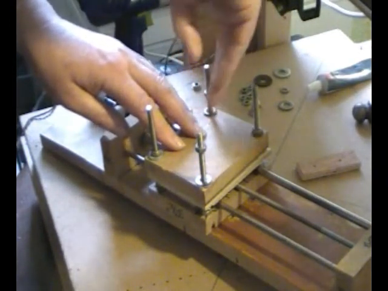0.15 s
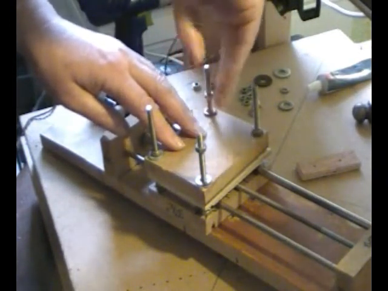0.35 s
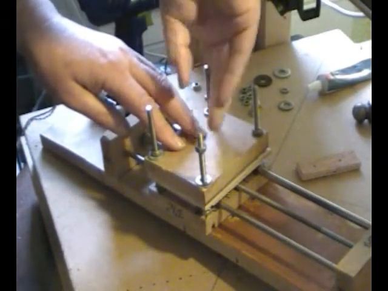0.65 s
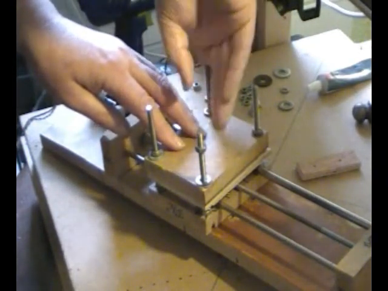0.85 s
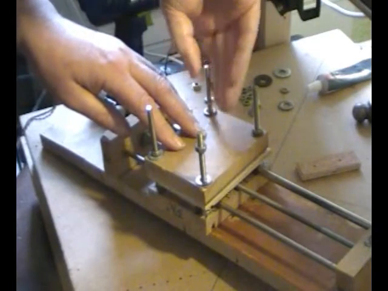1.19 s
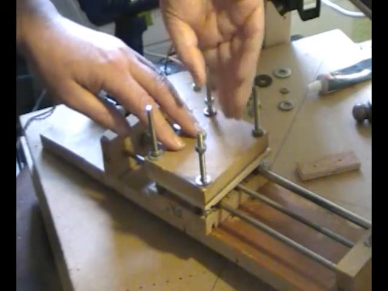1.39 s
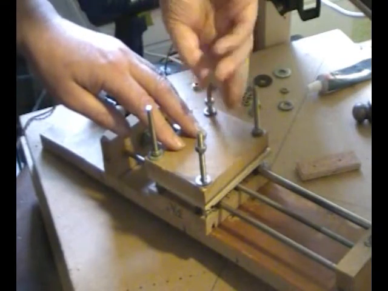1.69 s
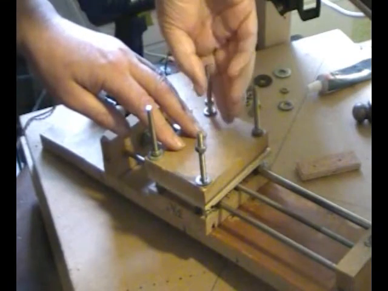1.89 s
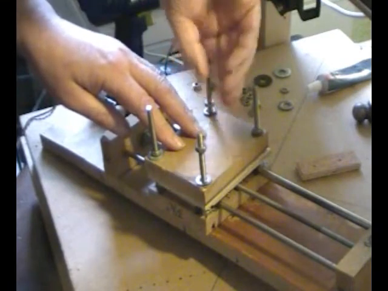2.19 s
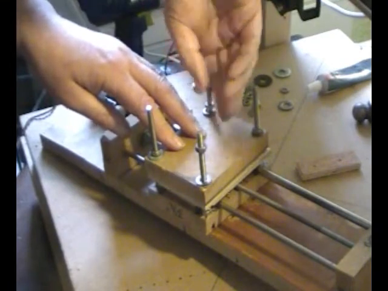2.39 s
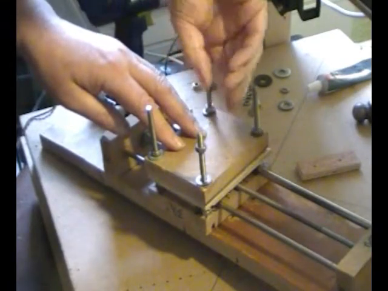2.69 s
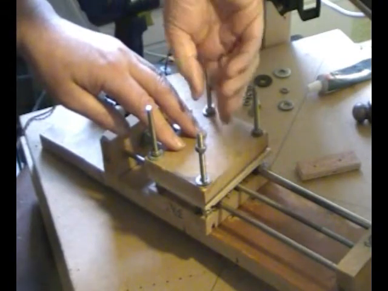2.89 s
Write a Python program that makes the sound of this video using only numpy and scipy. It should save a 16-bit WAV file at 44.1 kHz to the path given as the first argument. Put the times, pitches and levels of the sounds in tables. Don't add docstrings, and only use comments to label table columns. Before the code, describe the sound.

A steel nut is flicked down a threaded bolt on a wooden jig: five quick clacks with brief rattles, a short pause, then steady flicks again, close up in a small workshop with quiet hiss.

```python
import sys
import numpy as np
from scipy import signal
from scipy.io import wavfile
from scipy.ndimage import uniform_filter1d

SR = 44100
rng = np.random.default_rng(int(sys.argv[2]) if len(sys.argv) > 2 else 0)


def transcribe(signal):
    frames = np.atleast_2d(signal).T
    limited = np.clip(frames, -1, 1)
    pcm = np.round(limited * 32767).astype(np.int16)
    wavfile.write(sys.argv[1], SR, pcm)


def decibels_to_gain(level_db):
    exponent = np.asarray(level_db, float) / 20
    return 10 ** exponent


N = 134505
TIME_S = np.arange(N) / SR


def evened(x):
    return x / np.sqrt(np.mean(x ** 2) + 1e-20)


def read(points, hz):
    f, value = np.transpose(points)
    return np.interp(np.log(hz + 1), np.log(f + 1), value)


def add(mix, s, sound):
    part = mix[..., max(round(s * SR), 0):][..., :sound.shape[-1]]
    part += sound[..., :part.shape[-1]]


def through(force, response):
    return signal.oaconvolve(force, response)[:N]


def highpass(x, order, hz):
    return signal.sosfilt(signal.butter(order, hz, "high", fs=SR, output="sos"), x)


def ringing(hz, width_hz):
    t = np.arange(4096) / SR
    ring = np.exp(-np.pi * width_hz * t) * np.sin(2 * np.pi * hz * t)
    return ring / np.linalg.norm(ring)


def causal(points):
    half = np.log(decibels_to_gain(read(points, np.fft.rfftfreq(4096, 1 / SR))))
    full = np.r_[half, half[-2:0:-1]]
    taps = np.fft.ifft(np.exp(np.conj(signal.hilbert(full)))).real[:2048]
    return taps / np.linalg.norm(taps)


def share(force, nut_db, bolt_db):
    return force * decibels_to_gain([[-nut_db / 2], [nut_db / 2], [bolt_db]])


# (time [s], peak [dB], nut against board [dB], contact [s], bolt [dB])
FLICKS = [(0.186, -9, 12.5, 0.0016, 0), (0.3975, -7, 2.5, 0.0018, -8.5), (0.6, -11, 18, 0.002, -3.5),
          (0.818, -9, 6.5, 0.0026, -2), (1.0165, -15, 4.5, 0.003, 0.5), (1.5313, -29, -21, 0.0059, 11.5),
          (1.7698, -13.5, -4, 0.0025, -1), (2.022, -11.5, -2, 0.0025, 0.5),
          (2.2752, -15, -3.5, 0.0045, -1.5), (2.3056, 0.5, 4.5, 0.003, -18), (2.5363, -10.5, 2, 0.0023, -6),
          (2.767, -16, 1.5, 0.0032, 3), (3.0025, -4.5, 11, 0.0028, 3)]
# (time [s], peak [dB], nut against board [dB], contact [s], bolt [dB])
KNOCKS = [(0.0663, -26, 11, 0.0054, -8), (0.085, -25, 15, 0.0037, 3), (0.212, -21.5, -4, 0.00066, 14),
          (0.2286, -12.5, 4, 0.00079, 3.5), (0.2735, -26.5, 9, 0.0042, -2), (0.4269, -23.5, 14, 0.0077, 7),
          (0.46, -15, 8, 0.0019, -17), (0.6019, -5, 10, 0.0016, -1), (0.6312, -13.5, 12, 0.0039, -2.5),
          (0.8534, -28, -7, 0.00064, 18), (1.0868, -23, 6, 0.0016, 5.5), (1.089, -20, 4, 0.0036, -1),
          (1.1203, -32, 0, 0.0051, -3), (1.5874, -15.5, 4, 0.0015, -3), (2.0493, -31, -13, 0.0036, 7),
          (2.0686, -13, -1, 0.0011, 11.5), (2.097, -21, -1, 0.0026, 2), (2.301, -9, -5, 0.00058, 11),
          (2.5554, -21.5, -22, 0.0028, -13), (2.573, -25.5, -9, 0.0077, 2),
          (2.6342, -25.5, 4, 0.0014, -2.5), (2.787, -15.5, -2.5, 0.0034, -17),
          (2.8099, -20.5, 17.5, 0.0077, -0.5), (3.0041, -10.5, 9.5, 0.0035, -1.5)]
# (time [s], peak [dB], nut against board [dB],
# contact [s], bolt [dB])
TICKS = [(0.0034, -19.5, 4.5, 0.00092, -1), (0.0097, -16, 11, 0.0022, -10), (0.2558, -26, 0, 0.003, -8),
         (0.2958, -30, 5, 0.0018, 7.5), (0.8652, -27, 12, 0.0025, 4), (0.899, -33, 5, 0.0049, 7.5),
         (1.1155, -30, -16, 0.0014, 3), (1.1536, -19, 6, 0.001, 1), (1.546, -29, -26, 0.0014, 11),
         (1.6077, -29.5, -10.5, 0.0024, 2), (2.1156, -33.5, 5, 0.0018, 15), (2.148, -29, -4, 0.0052, 3.5),
         (2.4427, -31.5, -11, 0.0014, 1), (2.5038, -42, -13, 0.0019, 10), (2.655, -33, -2, 0.0021, -7),
         (1.8073, -31, -13, 0.0027, -7), (0.446, -24, 12, 0.0034, 1), (2.312, -21.5, -8, 0.0023, -17),
         (2.351, -27, 2, 0.002, 7), (2.392, -34, -4, 0.0014, 3), (2.413, -34, -9, 0.0015, 9),
         (1.141, -43, 5, 0.0035, -2), (1.093, -29, 18, 0.0037, 4), (2.6662, -33.5, 9, 0.0019, 11)]
BRUSHES = [-24.5, -29, -18.5, -22, -20, -22, -28, -26, -34, -30.5, -19, -27, -25.5]


def hits():
    hit_db, spike_db, spike_s, brush_s = -8, -11, 0.00016, 0.0087
    force, t = np.zeros((3, N)), np.arange(1024) / SR
    for s, db, nut_db, contact_s, bolt_db in FLICKS + KNOCKS + TICKS:
        shape = np.minimum(t / (0.28 * contact_s), 1) * np.exp(-(t / contact_s) ** 2)
        shape = shape + decibels_to_gain(spike_db) * np.exp(-((t - 0.31 * contact_s) / spike_s) ** 2)
        add(force, s, share(decibels_to_gain(db + hit_db) * shape, nut_db, bolt_db))
    brush = np.clip(1 - t / brush_s, 0, 1)[::-1] ** 2
    for (s, db, *_), brush_db in zip(FLICKS, BRUSHES):
        add(force, s - len(t) / SR, decibels_to_gain(db + brush_db) * brush[None])
    return force


# (start [s], run [s], level [dB], nut against board [dB], bolt [dB])
SPINS = [(0, 0.0035, -28, 1.5, 4.5), (.19, 0.017, -41.5, -6, 5.5), (0.216, 0.0069, -37.5, 8, -1),
         (0.399, 0.019, -39, -10, 0), (0.422, 0.046, -40, 0.5, 4), (0.607, 0.033, -38.5, -8, 5),
         (0.819, 0.055, -39.5, -5.5, 2), (1.062, 0.017, -51.5, 6, 3), (1.077, 0.015, -35, -1, 2.5),
         (1.114, 0.028, -36, -4, 2.5), (1.287, 0.022, -57, 16, -8), (1.312, 0.061, -56, 11, -7),
         (1.538, 0.035, -40.5, -8.5, 2), (1.589, 0.019, -51, 0, 5), (1.774, 0.054, -46, -11.5, 2.5),
         (2.051, 0.031, -33.5, -2, -2), (2.099, 0.02, -50, -18, -8), (2.31, 0.036, -35.5, -3, 1.5),
         (2.35, 0.065, -48, -11, -7), (2.537, 0.033, -35.5, 2.5, -0.5), (2.59, 0.085, -59, -8, 1),
         (2.776, 0.021, -38.5, -12, 0.5), (2.812, 0.003, -45, -12, -10), (3.006, 0.0054, -34.5, -2, -15)]


def spins():
    rise_s, t60_s = 0.0013, 0.11
    level = np.zeros((3, N))
    for s, run_s, db, nut_db, bolt_db in SPINS:
        t = np.arange(0, run_s + t60_s, 1 / SR)
        fade_db = -60 * np.maximum(t - run_s, 0) / t60_s
        shape = np.minimum(t / rise_s, 1) * decibels_to_gain(db + fade_db)
        add(level, s, share(shape, nut_db, bolt_db))
    return level


def wander():
    shift_db, shift_s = 1.8, .04
    knots = np.arange(0, N / SR + shift_s, shift_s)
    return decibels_to_gain(shift_db * np.interp(TIME_S, knots, rng.standard_normal(len(knots))))


def grit():
    chatter_per_s, spread_db, smear = 700, 3.2, .6
    sizes = decibels_to_gain(spread_db * np.minimum(rng.exponential(1, N), 4))
    sizes = sizes * (rng.random(N) < chatter_per_s / SR)
    return evened(evened(uniform_filter1d(sizes, size=70)) + smear)


def contacts(hit, spin, hz=0):
    clean_db, gritty_db, detune = -17, -4, .12
    run = spin * grit()
    phase = 2 * np.pi * np.cumsum(hz * wander() ** detune) / SR
    noise = rng.standard_normal(N)
    if hz == 0:
        return (hit + run) * noise
    return decibels_to_gain(clean_db) * hit * np.cos(phase) + (decibels_to_gain(gritty_db) * hit + run) * noise


# (time [s], board [dB], nut [dB], bolt [dB])
SEAT = [(0.01, 5.5, 0, -2), (0.2, 3.5, 2, 1), (0.41, 4, -1.5, 2.5), (0.62, 7.5, 4, 1.5),
        (0.83, 2, 0.5, 4.5), (1.02, 2, -0.5, -2.5), (1.12, 0.5, -3.5, 3), (1.33, -4, -0.5, -7),
        (1.56, 1, 3, 4), (1.79, -3, 7, 0.5), (2.03, -4.5, 7.5, 1.5), (2.08, 1, 0.5, 3.5), (2.28, 0, 5, 2),
        (2.33, -5.5, 5.5, 0), (2.55, 2.5, 2.5, -2), (2.65, 13.5, 8, 2), (2.8, -3, 3, -1.5),
        (3.01, 0, 5.5, 4)]
MIDDLE_HZ = [1960, 8000, 3600]
SPAN_HZ = [300, 900, 800]


def lean(part, hz):
    s, *db = np.transpose(SEAT)
    side = np.clip((hz - MIDDLE_HZ[part]) / SPAN_HZ[part], -1, 1) * (hz < 10000)
    return decibels_to_gain(side * np.interp(TIME_S, s, db[part]))


BOARD_HZ = [1460, 1780, 1960, 2135, 2370, 2805, 3135, 3750, 4270, 4600, 5450]
# (width [Hz], level [dB])
BOARD = [(60, -12.5), (60, -4), (80, -2.5), (90, 0.5), (120, -5), (167, -1), (178, -1.5), (307, -7),
         (280, -4.5), (303, -9), (340, -4.5)]
NUT_HZ = [7150, 7580, 7960, 8240, 8880, 9290, 11750]
# (width [Hz], level [dB])
NUT = [(245, -1), (256, -11), (149, -11.5), (304, -10), (270, -3), (304, -11), (900, -12.5)]


def jig_ring(hit, spin):
    board_db, nut_db, bolt_from_hz = -12.5, -11.5, 2600
    grip_hz = 140
    free_end_hz, free_end_db_per_s = 5450, -5
    modes = [(2 if hz > bolt_from_hz else 0, hz, width_hz, db + board_db)
             for hz, (width_hz, db) in zip(BOARD_HZ, BOARD)]
    modes += [(1, hz, width_hz, db + nut_db) for hz, (width_hz, db) in zip(NUT_HZ, NUT)]
    ring = np.zeros(N)
    for part, hz, width_hz, db in modes:
        hit_gain = .5 if hz > 10000 else 1
        force = lean(part, hz) * wander() * contacts(hit[part] * hit_gain, spin[part], hz)
        if abs(hz / free_end_hz - 1) < .1:
            db = db + free_end_db_per_s * (TIME_S - 1)
        ring += decibels_to_gain(db) * through(force, ringing(hz, max(width_hz, grip_hz)))
    return highpass(ring, 4, 1150)


# (frequency [Hz], width [Hz], level [dB])
HOLLOW = [(601.4, 21.7, -28), (384, 46, -33.5)]
# (time [s], level [dB])
PRESS = [(0.05, -0.5), (0.24, 6.5), (0.44, 3), (0.64, -0.5), (0.85, 0.5), (1.13, 1), (1.3, 5), (1.569, 2),
         (1.8, -6), (2.1, 0.5), (2.32, 1.5), (2.57, 0), (2.8, -4.5), (3.02, 2)]


def hollow(hit, spin):
    boom = np.zeros(N)
    for hz, width_hz, db in HOLLOW:
        force = wander() * contacts(.5 * hit[0], spin[0])
        boom += decibels_to_gain(db) * through(force, ringing(hz, width_hz))
    return boom * decibels_to_gain(np.interp(TIME_S, *np.transpose(PRESS)))


# (frequency [Hz], level [dB])
CRACK = [(200, -25), (1000, -16), (1500, -8.5), (2200, -14), (5100, -3), (9000, -8), (12500, -10),
         (16000, -29)]


def crack(hit, spin):
    return decibels_to_gain(-11) * through(contacts(hit.min(0), spin.mean(0)), causal(CRACK))


def thump(hit):
    hz, width_hz, db = 80, 100, -69
    return decibels_to_gain(db) * through(hit.min(0), ringing(hz, width_hz))


# (middle [s], length [s], level [dB], frequency [Hz])
RUSTLES = [
    (0.999, 0.0071, -47, 870),
    (2, 0.024, -67, 730),
    (1.8, 0.2, -86, 390),
]


def rustles():
    out = np.zeros(N)
    for s, length_s, db, hz in RUSTLES:
        rub = signal.oaconvolve(rng.standard_normal(8192), ringing(hz, 0.19 * hz))
        rub = rub[:round(length_s * SR)]
        add(out, s - length_s / 2, decibels_to_gain(db) * rub * np.hanning(len(rub)))
    return out


# (frequency [Hz], t60 [s])
ROOM = [(400, 0.58), (1100, 0.38), (2800, 0.34), (7400, 0.27), (12000, 0.067)]


def tail():
    delay_s, spacing = .003, 20
    taps = np.zeros(SR // 2)
    at = np.arange(0, len(taps) - spacing, spacing)
    at = at + rng.integers(0, spacing, len(at))
    taps[at] = rng.choice([-1., 1.], len(at))
    hz, t, z = signal.stft(taps, SR, nperseg=256)
    decay = decibels_to_gain(-60 * t / read(ROOM, hz)[:, None])
    out = signal.istft(z * decay, SR, nperseg=256)[1]
    out = np.r_[np.zeros(round(delay_s * SR)), out]
    return out / np.linalg.norm(out)


def workshop(x):
    room_db, sway_s = -10, .23
    turn = np.pi * TIME_S / (3 * sway_s)
    wet = np.zeros(N)
    for k in range(3):
        facing = np.sqrt(2 / 3) * np.cos(turn + k * np.pi / 3)
        wet += signal.fftconvolve(x * facing, tail())[:N]
    return decibels_to_gain(room_db) * wet


EDGE_HZ = 12650
# (frequency [Hz], level [dB])
FLOOR = [(30, -26), (130, -12), (300, 1), (600, 2.5), (1100, 4), (1600, -0.5), (5000, -6.5), (12500, -10)]


def floor():
    floor_db, patch_db = -61, 1.5
    frames, hz = N // 256 + 5, np.fft.rfftfreq(1024, 1 / SR)
    a, b, patches = rng.standard_normal((frames, 513, 3)).T
    patches = uniform_filter1d(patches, size=10, axis=0)
    patches = evened(uniform_filter1d(patches, size=14, axis=1))
    gain = decibels_to_gain(read(FLOOR, hz)[:, None] + patch_db * patches)
    z = (a + 1j * b) * (hz < EDGE_HZ + 200)[:, None] * gain
    return decibels_to_gain(floor_db) * evened(signal.istft(z, nperseg=1024, noverlap=768)[1][:N])


def scene():
    hit, spin = hits(), spins()
    jig = jig_ring(hit, spin) + hollow(hit, spin) + crack(hit, spin)
    near = highpass(jig + rustles(), 3, 175) + thump(hit)
    return (near + workshop(near) + floor())[None]


def top_cut(x):
    return signal.sosfilt(signal.butter(12, 16400, fs=SR, output="sos"), x)


def record(dry):
    above_edge_db, open_share = -19, .85
    lowpass = signal.firwin(511, EDGE_HZ, window=("kaiser", 7), fs=SR)
    low = signal.oaconvolve(dry, lowpass[None], "same")
    is_open = rng.random(N // 1024 + 1) < open_share
    patches = uniform_filter1d(np.repeat(is_open, 1024)[:N] * 1., size=300)
    mix = low + decibels_to_gain(above_edge_db) * patches * (dry - low)
    return top_cut(mix)


dry = scene()
out = record(dry)
transcribe(out)
```